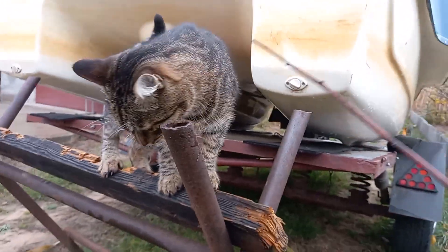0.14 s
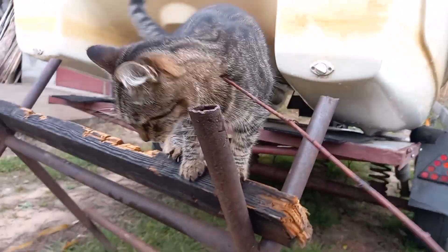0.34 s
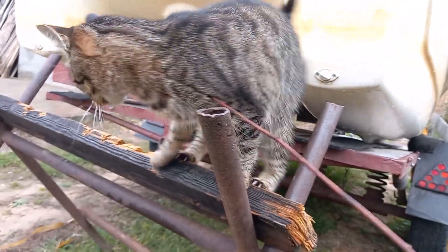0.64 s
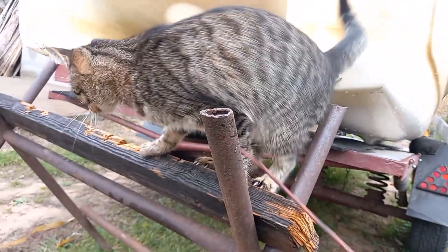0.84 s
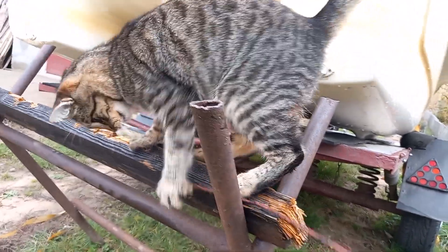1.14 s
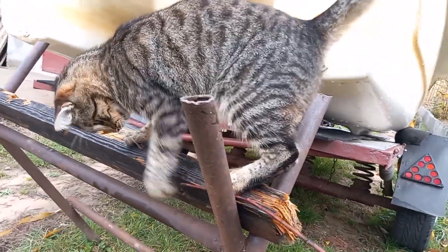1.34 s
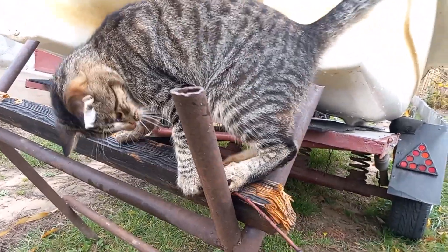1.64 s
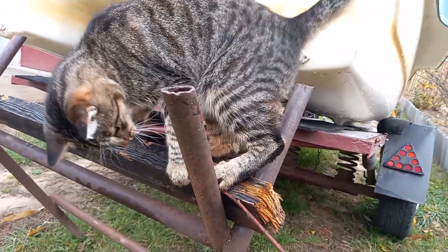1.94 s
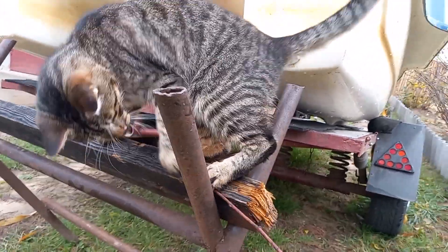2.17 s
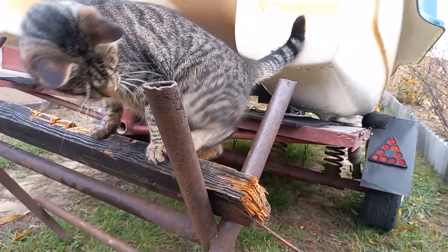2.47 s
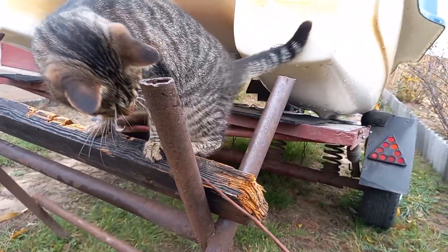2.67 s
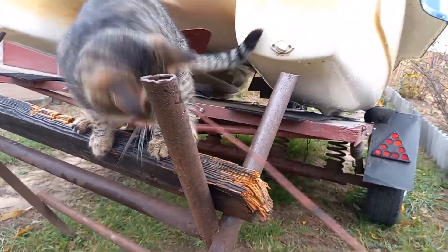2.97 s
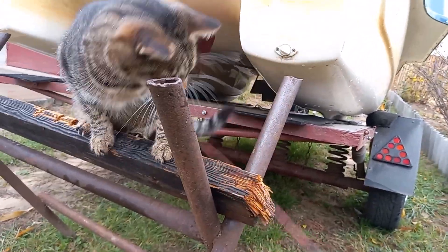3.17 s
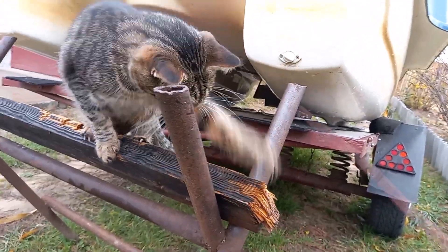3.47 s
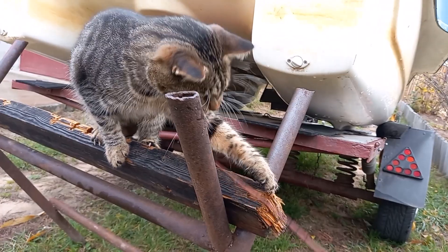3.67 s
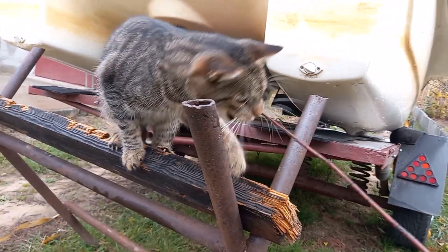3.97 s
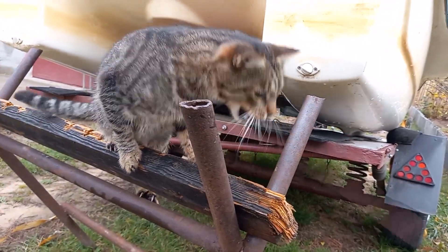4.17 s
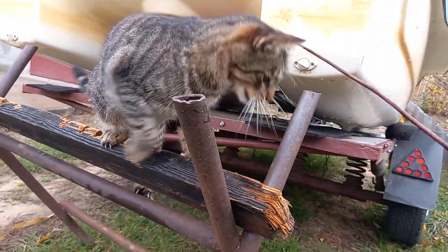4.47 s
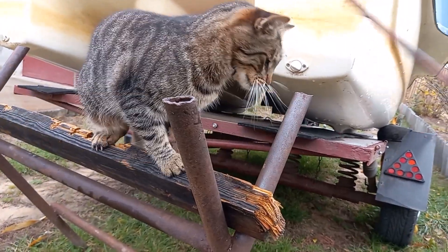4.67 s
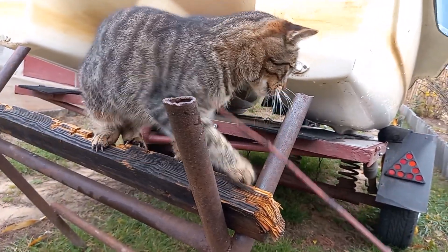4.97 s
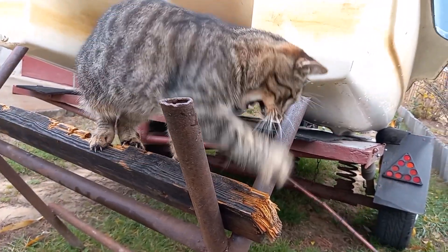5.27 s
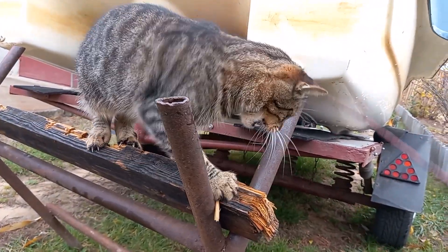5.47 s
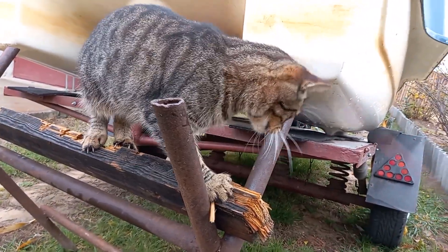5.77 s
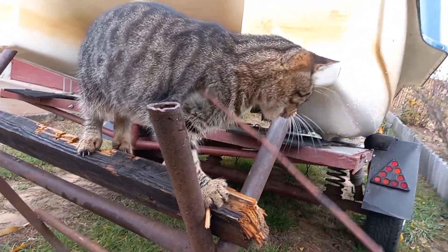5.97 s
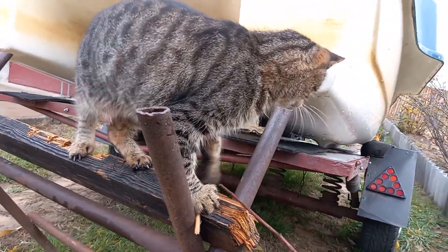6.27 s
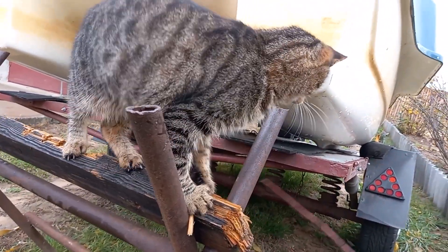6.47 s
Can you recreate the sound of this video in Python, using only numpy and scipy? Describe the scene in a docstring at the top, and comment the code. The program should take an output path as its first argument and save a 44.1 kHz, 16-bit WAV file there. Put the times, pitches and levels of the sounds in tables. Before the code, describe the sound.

Claws and a twig scratch and tick on splintered wood and metal tube, with two hoarse sparrow chirps and low wind thumps in a quiet yard.

```python
"""A quiet yard of filtered noise, faint tones and breeze rumble, as a cat paws at a twig on a steel trailer frame.
From the start: noise strokes of dragging, a hoarse whistled sparrow chirp, a double knock of ringing tube modes;
then noise ticks of claw and twig on a splintered plank, a low puff of wind, and from 1.7 s clear bird peeps.
From 3.4 s wavering low sines of wind thump, mostly left; at 4.2 s the tube knocks again.
From 4.1 s come thin high notes, at 5 s a second near chirp, then hoarse far chatter."""
import sys
import numpy as np
from scipy import signal
from scipy.fft import rfft, irfft, next_fast_len
from scipy.io import wavfile
from scipy.ndimage import map_coordinates

SR = 44100
rng = np.random.default_rng(int(sys.argv[2]) if len(sys.argv) > 2 else 0)


def digitize_waveform(pressure):
    """Quantize a signal to 16-bit integers and store it at the path in sys.argv[1].

    Rows of a 2-D input are taken as channels; values are limited to [-1, 1].
    """
    field = np.atleast_2d(pressure).T
    bounded = np.clip(field, -1, 1)
    quanta = np.round(bounded * 32767).astype(np.int16)
    wavfile.write(sys.argv[1], SR, quanta)


N = 291721


def amp(db):
    """Decibels to gain."""
    return 10 ** (np.asarray(db) / 20)


def unit(x):
    """Scale to rms 1."""
    return x / np.sqrt(np.mean(x ** 2) + 1e-20)


def along(points, hz):
    """Interpolate (Hz, value) points on a log frequency axis."""
    point_hz, values = np.transpose(points)
    return np.interp(np.log(hz + 1), np.log(point_hz + 1), values)


def wobble(knots_per_s, size=N):
    """Smooth random curve through normal knots."""
    knots = rng.standard_normal(int(size * knots_per_s / SR) + 4)
    return map_coordinates(knots, [np.arange(size) * knots_per_s / SR])


def filtered(x, response):
    """Multiply the spectrum of x by a complex response(hz)."""
    m = next_fast_len(N + SR // 2)
    return irfft(rfft(x, m) * response(np.fft.rfftfreq(m, 1 / SR)), m)[..., :N]


def coloured(x, spectrum):
    """Filter x by a spectrum normalised to keep the level of white noise."""
    grid_hz = np.linspace(0, SR / 2, num=2000)
    norm = np.sqrt(np.mean(amp(along(spectrum, grid_hz)) ** 2))
    return filtered(x, lambda hz: amp(along(spectrum, hz)) / norm)


def add(track, start_s, sound):
    """Mix a sound into a track."""
    part = track[..., max(round(start_s * SR), 0):][..., :sound.shape[-1]]
    part += sound[..., :part.shape[-1]]


def sides(pan_db):
    """Left and right gains, left over right by pan_db."""
    return amp([[pan_db / 2], [-pan_db / 2]])


def ports(x, lead_ms):
    """Two ports lie apart: the left one hears a source on its side first."""
    shift_s = lead_ms / 1000 * np.array([[1], [-1]])  # half the lead each way
    return filtered(x, lambda hz: np.exp(1j * np.pi * hz * shift_s))


def echoes(x, decay, level_db):
    """Scattered reflections: a noise tail whose every frequency dies at its own speed."""
    hz, t, z = signal.stft(rng.standard_normal((2, SR // 2)), SR, nperseg=256)
    fade = amp(-60 * t / along(decay, hz)[:, None])
    tail = signal.istft(z * fade, SR, nperseg=256)[1]
    tail /= np.linalg.norm(tail[0])
    return amp(level_db) * signal.fftconvolve(x, tail, axes=1)[:, :N]


# far traffic and leaves: (frequency [Hz], level [dB per Hz])
AIR_SPECTRUM = [(120, -35), (200, -9), (311, -15.5), (373, -11.5), (899, -22.5), (968, -22.5),
                (1160, -23.5), (2750, -29), (3970, -30), (6400, -37), (16000, -34.5)]
# breeze at the ports: (frequency [Hz], level [dB per Hz])
BREEZE_SPECTRUM = [(15, -41.5), (25, -27), (37, -8.5), (64, 3), (177, -11.5), (217, -13), (300, -15),
                   (390, -27), (660, -120)]
# breeze strength before a fixed lift: (time [s], level [dB])
BREEZE_LEVEL = [(0, -61), (.5, -64), (2.5, -64.5), (3.3, -64), (4.7, -60.5), (5.3, -63.5), (6.61, -64.5)]
# far wavering tones: (start [s], end [s], frequency [Hz], level [dB])
FAR_TONES = [(2.12, 2.89, 500, -68), (3.1, 4.5, 465, -69), (1.166, 2.68, 240, -66.5)]
AIR_DB = -63.5


def yard():
    """Noise of far traffic and leaves, lumpy breeze rumble in both ports, faint tones that come and go."""
    time_s = np.arange(N) / SR
    air_level = amp(AIR_DB + 0.7 * wobble(3))
    air = air_level * coloured(rng.standard_normal((2, N)), AIR_SPECTRUM) * sides(1.6764)

    point_s, point_db = np.transpose(BREEZE_LEVEL)
    lumps_db = 1.26 * np.array([wobble(7.6), wobble(12)])
    lumps = amp(np.interp(time_s, point_s, point_db) + 6.0 + lumps_db)
    noise = rng.standard_normal((2, N)) + 0.5 * rng.standard_normal(N)  # partly shared by the ports
    breeze = lumps * coloured(noise, BREEZE_SPECTRUM) * sides(3.4)

    tones = np.zeros(N)
    for start_s, end_s, hz, db in FAR_TONES:
        arch = np.sin(np.pi * np.clip((time_s - start_s) / (end_s - start_s), 0, 1))
        turn = 2 * np.pi * np.cumsum(hz * (1 + 0.0053 * wobble(18))) / SR
        tones += amp(db + 4.3 * wobble(5.64)) * arch * np.sin(turn)
    return air + breeze + tones


# plank resonances: (frequency [Hz], width [Hz], level [dB])
PLANK_MODES = [(507, 230, -4.5), (663, 83, 2.5), (885, 75, 0.5), (1993, 70, -5)]


def plank(hz):
    """Response of the plank: resonances of alternating sign."""
    total = 0
    for k, (centre, width, db) in enumerate(PLANK_MODES):
        damping = 1j * hz * width
        total = total + (-1) ** k * amp(db) * damping / (centre ** 2 - hz ** 2 + damping)
    return total


# strokes of fur, paws, twig: (start [s], length [s], grit level [dB], bright level [dB], airy level [dB])
STROKES = [(0, 0.1, -61.5, -67.5, -79), (0.227, 0.1, -60, -66, -83), (0.315, 0.21, -65.5, -71.5, -87.5),
           (0.532, 0.15, -65.5, -69, -85), (0.686, 0.095, -75, -68.5, -92.5),
           (0.981, 0.28, -67, -68.5, -76), (1.39, 0.27, -73.5, -72.5, -78), (1.949, 0.25, -59, -57, -60.5),
           (2.181, 0.24, -67, -63.5, -72), (2.454, 0.04637, -38, -46, -53.5),
           (2.786, 0.24, -69, -73, -79.5), (3.505, 0.11, -70, -72, -72.5),
           (3.617, 0.099, -65.5, -65.5, -84), (3.788, 0.1113, -63.5, -67, -61.5),
           (4.034, 0.063, -38.5, -39, -61), (4.104, 0.021, -69, -53, -56),
           (4.633, 0.13, -69.5, -79.5, -102), (4.816, 0.05797, -52.5, -60, -89)]
# body of a scratch, also used by ticks: (frequency [Hz], level [dB per Hz])
GRIT_SPECTRUM = [(1000, -11.5), (1800, -2.5), (2800, -2), (4200, 0.5), (5500, -3), (7000, -43.5)]
# bright part of a scratch, also used by ticks: (frequency [Hz], level [dB per Hz])
BRIGHT_SPECTRUM = [(4500, -21), (6200, -1.5), (7500, 2.5), (8600, 1.5), (9400, -16.5), (11000, -29.5)]
# airy top of a scratch, also used by ticks: (frequency [Hz], level [dB per Hz])
AIRY_SPECTRUM = [(7500, -28.5), (10000, -3.5), (12500, -2), (16000, -6.5)]


def drag():
    """Friction: dense slips of uneven size under each stroke, partly through the plank."""
    strokes = np.zeros((3, N))
    for start_s, length_s, *levels_db in STROKES:
        u = np.linspace(0, 1, round(length_s * SR))
        add(strokes, start_s, amp(levels_db)[:, None] * np.sin(np.pi * u ** 0.65) ** 1.2)
    sizes = unit(amp(1.5 * wobble(40) + 3.5 * wobble(500)))
    slips = sizes * unit(rng.standard_normal(N) + 2.8 * rng.standard_normal((2, N)))
    grit, bright, airy = strokes[:, None] * slips
    in_plank = amp(2) * filtered(grit + 1.5 * grit.mean(axis=0), plank)
    rub = (coloured(grit, GRIT_SPECTRUM) + in_plank) * sides(2.87)
    rub += coloured(bright, BRIGHT_SPECTRUM) * sides(2.1)
    rub += coloured(airy, AIRY_SPECTRUM) * sides(2.5)

    def bounce(hz):
        """Sound repeats between plank and hull every 1/1030 s."""
        return 1 / (1 - 0.1408 * np.exp(-2j * np.pi * hz / 1030))

    return ports(filtered(rub, bounce), lead_ms=0.285)


def voice(hz, rough, over_db, uneven):
    """Syrinx: a whistle with two overtones; hoarseness shakes pitch and size, alternate cycles differ."""
    n = len(hz)
    turn = 2 * np.pi * np.cumsum(hz * (1 + 0.0698 * rough * wobble(603, size=n))) / SR
    shake = 0.8952 * wobble(448.55, size=n) + 0.12 * wobble(2500, size=n)
    flutter = unit(1 + rough * shake)
    pairs = 1 + uneven * np.sin(turn / 2)
    overtones = amp(over_db) * (np.sin(2 * turn) + 0.15 * np.sin(3 * turn))
    return np.sqrt(2) * flutter * pairs * (np.sin(turn) + overtones)


# near sparrow: (start [s], loudest [s], end [s], peak level [dB], fade [dB/s], hoarseness [0-1])
NEAR_CHIRPS = [(0, 0.016, 0.08642, -32.5, 25, 0.41), (5.024, 5.059, 5.135, -30.5, 201, 0.77)]
# falling, jagged pitch, one list per chirp: (time [s], frequency [Hz])
NEAR_PITCH = [
    [(0, 4270), (.008, 4644), (.018, 3613), (.03, 4583), (.038, 4387), (.048, 2975), (.075, 3320),
     (.1, 2920)],
    [(5.025, 6570), (5.045, 5130), (5.053, 4520), (5.062, 4300), (5.078, 3200), (5.088, 3715),
     (5.105, 2940), (5.115, 3463), (5.135, 2484)],
]
# gain of the open beak by pitch: (frequency [Hz], level [dB])
BEAK_GAIN = [(2400, -16), (3200, -5), (4450, -2), (5200, -4), (6500, -11)]
SWELL_DB_PER_S, RELEASE_S = 510, 0.017  # release: time constant
LOWER_PITCH_RATIO, LOWER_DB, LOWER_FADE_DB_PER_S = 0.84, -6, 400


def chirps():
    """Quick swell, slower fade, short release; the second side of the syrinx joins the start, lower."""
    song = np.zeros(N)
    for (start_s, top_s, end_s, db, fade, rough), pitch in zip(NEAR_CHIRPS, NEAR_PITCH):
        t = np.arange(start_s, end_s + 0.05, 1 / SR)
        level = amp(db - np.maximum(SWELL_DB_PER_S * (top_s - t), fade * (t - top_s)))
        level *= np.exp(-np.maximum(t - end_s, 0) / RELEASE_S)
        hz = np.interp(t, *np.transpose(pitch))
        upper = voice(hz, rough, over_db=-30, uneven=0.039)
        lower = voice(LOWER_PITCH_RATIO * hz, rough, over_db=-21.5, uneven=0)
        lower *= amp(LOWER_DB - LOWER_FADE_DB_PER_S * (t - start_s))
        add(song, start_s, level * amp(along(BEAK_GAIN, hz)) * (upper + lower))
    return song * sides(3.113)


# blows on the tube: (time [s], level [dB])
TUBE_KNOCKS = [(.148, -37), (0.159, -37), (4.217, -42), (4.228, -39.5)]
# tube modes: (frequency [Hz], level [dB], t60 [s])
TUBE_MODES = [(441.78, -7, 0.058), (1100, 5, 0.008806), (1149, -8, 0.04464), (1260, -28.5, 3.152),
              (3213.3, -8.5, 0.01468), (4494, -20.5, 0.00866), (8272.3, -17, .012)]


def knocks():
    """The hollow tube rings in decaying modes; its loose mounting blurs their phase."""
    tube = np.zeros(N)
    t = np.arange(SR // 2) / SR
    for time_s, db in TUBE_KNOCKS:
        blur_rad = 3 * wobble(130, size=len(t)) * (1 - np.exp(-t / 0.04))
        ring = np.zeros(len(t))
        for hz, mode_db, t60_s in TUBE_MODES:
            ring += amp(mode_db - 60 * t / t60_s) * np.sin(2 * np.pi * hz * t + blur_rad)
        add(tube, time_s, amp(db) * ring)
    return tube * sides(0.54)


# claw and twig: (time [s], grit level [dB], bright part over it [dB], wooden part over it [dB])
TICK_EVENTS = [(0.2107, -61.5, 3, 26), (0.4023, -41.5, -8, -10), (0.415, -54.5, -18, 24.5),
               (0.584, -51.5, -3, 14), (0.6503, -68.5, 6, 38), (0.7044, -61.5, 13.5, 20),
               (0.7292, -63.5, 10, 23), (0.7855, -52.5, -1, -10), (0.79, -50, 3.5, -1),
               (1.052, -52.5, -1, 20), (1.0682, -50.5, -2, -8.5), (1.275, -47, 3.5, -20),
               (1.3358, -46.5, -7, -9), (1.363, -46, -7, 5), (1.965, -42, -28, 17), (2.0384, -52, 9, -14),
               (2.251, -53.5, 8, -6), (2.3588, -70, 15, 33.5), (2.4572, -37.5, 11, -17),
               (2.4805, -33.5, -6, 4), (2.587, -50, -2, 0), (2.7865, -54, -14, -10), (3.0601, -47, 9.5, 4),
               (3.119, -54.5, 0.5, 19.5), (3.2442, -63, -3, 21.5), (3.4081, -63, -27.5, 23.5),
               (3.5116, -59, -8, 29.5), (3.6315, -40, -9.5, -13), (3.706, -47.5, -3.5, -6),
               (3.7771, -51.5, 22.5, 13), (3.854, -48, 4, -3.5), (3.946, -54, -5.5, 23.5),
               (4.0059, -55.5, -8, 23.5), (4.0338, -47, -5, 26), (4.0672, -26.5, -4.5, 11.5),
               (4.076, -24.5, 2.5, -28.5), (4.4205, -61.5, 10.5, 28), (4.575, -61.5, 3, 22),
               (4.8257, -37.5, -11.5, -23.5), (4.846, -43, -30, -18.5), (5.141, -48, -2.5, 6),
               (5.3147, -58, -28.5, 33), (5.4481, -57.5, 1.5, 7), (6.153, -60, -9, 16)]
CREAK_S, CREAK_DB = 0.004, -18
CRACK_T60_S, SLIPS_T60_S, ONSET_S = 0.0019, 0.032, 0.00033  # onset: time constant
TICK_PAN_DB, PAN_SCATTER_DB = 4, 2
AIRY_DB, AIRY_PER_BRIGHT_DB = -17.5, 1.51  # the airy top grows faster than the bright part


def ticks():
    """The claw creaks faintly, lets go with a crack, then smaller slips die away; all parts share the blow."""
    parts = np.zeros((4, 2, N))  # grit, bright, airy, wood
    own_share = np.array([1.4, 0.99, 1.1, 0.95])[:, None, None]
    lead = np.arange(SR // 5) / SR - CREAK_S
    t = np.maximum(lead, 0)
    for time_s, db, bright_db, wood_db in TICK_EVENTS:
        crack = 1.72 * amp(-60 * t / CRACK_T60_S)
        slips = 0.45 * amp(-60 * t / SLIPS_T60_S) * amp(2.25 * wobble(400, size=len(t)))
        common = rng.standard_normal(len(t))
        own = rng.standard_normal((2, len(t)))
        pan = sides(TICK_PAN_DB + PAN_SCATTER_DB * rng.standard_normal())
        creak = amp(CREAK_DB) * (lead < 0) * (1 + lead / CREAK_S)
        onset = 1 - np.exp(-t / ONSET_S) + creak
        blow = onset * (crack + slips) * (common + own_share * own) * pan
        over_db = np.array([0, bright_db, AIRY_DB + AIRY_PER_BRIGHT_DB * bright_db, wood_db])
        add(parts, time_s - CREAK_S, amp(db + over_db)[:, None, None] * blow)
    grit, bright, airy, wood = parts
    top = coloured(bright, BRIGHT_SPECTRUM) + coloured(airy, AIRY_SPECTRUM)
    taps = coloured(grit, GRIT_SPECTRUM) + top * sides(2.301) + filtered(wood, plank)
    return ports(taps, lead_ms=0.088)


# wind on one port: (centre [s], level [dB], Gaussian half length [s], port [L/R])
WIND_PUFFS = [(0.32, -37.5, 0.0078, "L"), (3.469, -20, .014, "L"), (3.545, -16.5, .011, "L"),
              (3.607, -33, 0.0731, "L"), (3.655, -16, 0.016, "L"), (3.727, -17.5, 0.012, "L"),
              (3.759, -13.5, 0.00606, "L"), (3.786, -19, 0.015, "L"), (3.832, -16.5, 0.008914, "L"),
              (3.855, -25.5, .012, "L"), (3.904, -26.5, 0.016, "L"), (3.976, -26.5, 0.0204, "L"),
              (3.978, -50, 0.01487, "R"), (4.032, -13, 0.005336, "L"), (4.053, -22, 0.037, "L"),
              (4.199, -22.5, 0.013, "L"), (4.262, -25.5, 0.036, "L"), (4.39, -33.5, 0.0184, "L"),
              (4.456, -22.5, 0.023, "L"), (4.49, -20.5, 0.0057, "L"), (4.517, -27.5, 0.022, "L"),
              (4.622, -41, 0.014, "L"), (4.722, -43, 0.01359, "R"), (4.955, -32.5, 0.00997, "L"),
              (4.97, -48, 0.03, "R"), (4.997, -33, 0.016, "L"), (5.046, -23, 0.018, "L"),
              (5.099, -41.5, 0.029, "R"), (5.112, -26.5, 0.008, "L")]
EDDY_HZ, EDDY_EXTRA_CYCLES = 60.86, 0.28  # pitch of a long puff; cycles added per half length
PHASE_SAG_PER_S = 4.8  # pitch sags at twice this rate


def puffs():
    """An eddy pushes one diaphragm in slow, unsteady cycles: short ones are higher, overtones swell mid-puff."""
    left_right = np.zeros((2, N))
    t = np.arange(-SR // 8, SR // 8) / SR
    for centre_s, db, half_s, port in WIND_PUFFS:
        hz = EDDY_HZ + EDDY_EXTRA_CYCLES / half_s
        cycles = hz * t * (1 - PHASE_SAG_PER_S * t) + rng.random()
        turn = 2 * np.pi * cycles + 0.75 * wobble(50.5, size=len(t))
        swell = np.exp(-0.5 * (t / half_s) ** 2)
        wave = np.sin(turn) + 0.41 * np.sin(turn / 2)
        wave += swell * (0.12588 * np.sin(2 * turn + 1) + 0.058 * np.sin(3 * turn))
        add(left_right["LR".index(port)], centre_s + t[0], amp(db) * swell * wave)
    return left_right


# throat rasp: (frequency [Hz], level [dB per Hz])
THROAT_SPECTRUM = [(1300, -17.5), (2100, -3.5), (3000, -2.5), (4300, 3), (5600, -8), (7000, -31)]


def notes(table, bow, rough, over_db, uneven, rasp_db):
    """Short whistles whose pitch bows by a share mid-way; noise rasps through the throat."""
    song, noise = np.zeros(N), np.zeros(N)
    for start_s, length_s, start_hz, end_hz, db in table:
        u = np.linspace(0, 1, round(length_s * SR))
        arch = amp(db) * np.sin(np.pi * u ** 0.92) ** 0.857
        hz = (start_hz + (end_hz - start_hz) * u) * (1 + bow * np.sin(np.pi * u))
        add(song, start_s, arch * voice(hz, rough, over_db, uneven))
        add(noise, start_s, arch * amp(6.4 * wobble(292, size=len(u))) * rng.standard_normal(len(u)))
    return song + amp(rasp_db) * coloured(noise, THROAT_SPECTRUM)


# clear peeps: (start [s], length [s], start pitch [Hz], end pitch [Hz], level [dB])
PEEP_NOTES = [(1.752, 0.03742, 1800, 1748, -67.5), (1.868, 0.044, 1780, 1720, -64),
              (6.435, 0.029, 2450, 2189, -57.5)]


def peeps():
    """Clear whistles of arched pitch with weak overtones."""
    song = notes(PEEP_NOTES, bow=0.136, rough=0.29, over_db=-13.5, uneven=0, rasp_db=-22)
    return song * sides(2.165)


# thin high notes: (start [s], length [s], start pitch [Hz], end pitch [Hz], level [dB])
SEEP_NOTES = [(4.098, 0.029, 8220, 7600, -46), (4.58, 0.026, 8480, 7600, -60),
              (4.61, 0.04, 8920, 7480, -62.5), (4.66, 0.018, 8680, 7570, -59)]


def seeps():
    """A small bird's high falling whistles, sagging mid-way, almost without overtones."""
    song = notes(SEEP_NOTES, bow=-0.03, rough=0.41, over_db=-42.5, uneven=0, rasp_db=-31.5)
    return song * sides(7.9)


# far sparrows: (start [s], length [s], start pitch [Hz], end pitch [Hz], level [dB])
CHATTER_NOTES = [(5.24, .055, 1291, 1196, -75.5), (6.135, .085, 1493, 1910, -75),
                 (6.255, 0.076, 2000, 2100, -64.5), (6.405, 0.033, 2650, 2193, -69.5),
                 (6.43, 0.038, 1870, 1862, -61.5), (6.53, 0.068, 2510, 2360, -73),
                 (6.55, 0.05011, 1954, 1930, -68)]


def chatter():
    """Hoarse notes with overtones above the fundamental, uneven cycles and strong rasp."""
    song = notes(CHATTER_NOTES, bow=0.09, rough=0.55, over_db=7.5, uneven=0.5, rasp_db=5.5)
    return song * sides(2.17)


# decay of frame and hull: (frequency [Hz], t60 [s])
FRAME_DECAY = [(300, 0.21), (3000, 0.13), (10000, 0.12)]
# decay of walls and trees: (frequency [Hz], t60 [s])
GARDEN_DECAY = [(2000, 0.46), (4000, 0.34), (8000, 0.48)]


def scene():
    """Ticks, knocks and birds echo in the frame; chirps, seeps and chatter also in the garden."""
    taps, tube = ticks(), knocks()
    near = drag() + taps + echoes(taps, FRAME_DECAY, level_db=-5)
    near += tube + echoes(tube, FRAME_DECAY, level_db=-10)

    close, clear, far = chirps(), peeps(), seeps() + chatter()
    birds = ports(close, lead_ms=0.428)
    birds += echoes(close, FRAME_DECAY, level_db=0.5) + echoes(close, GARDEN_DECAY, level_db=-4.5)
    birds += clear + echoes(clear, FRAME_DECAY, level_db=-5)
    birds += amp(-5.5) * ports(far, lead_ms=0.073)
    birds += echoes(far, FRAME_DECAY, level_db=0.5) + echoes(far, GARDEN_DECAY, level_db=-11.5)
    return yard() + near + birds + puffs()


LOW_CUT_HZ, TOP_HZ = 30, 15900


def record(dry):
    """The microphone chain cuts the deepest bass and keeps nothing above its band limit."""
    return filtered(dry, lambda hz: (hz < TOP_HZ) * hz ** 3 / (hz ** 3 + LOW_CUT_HZ ** 3))


dry = scene()
out = record(dry)
digitize_waveform(out)
```